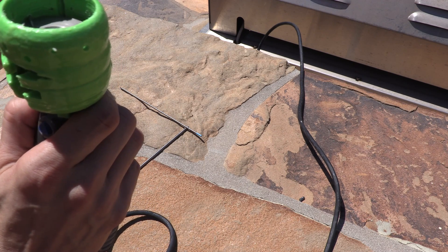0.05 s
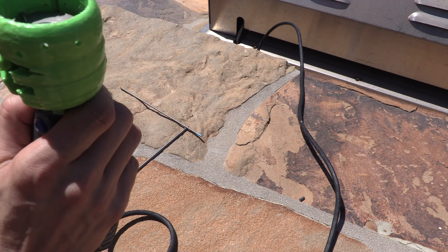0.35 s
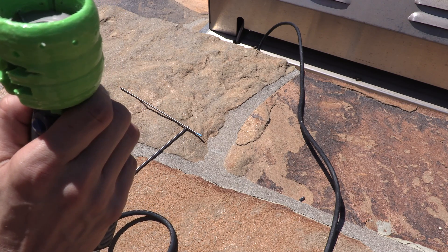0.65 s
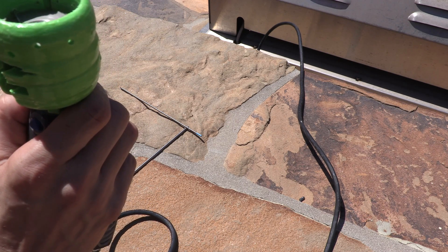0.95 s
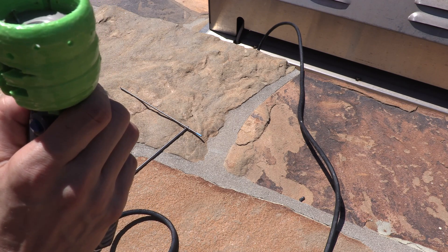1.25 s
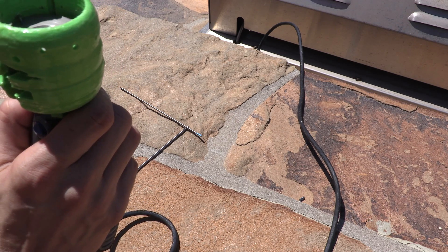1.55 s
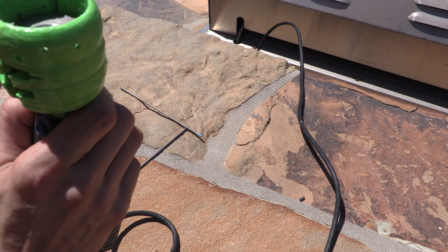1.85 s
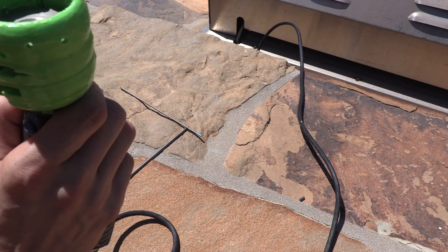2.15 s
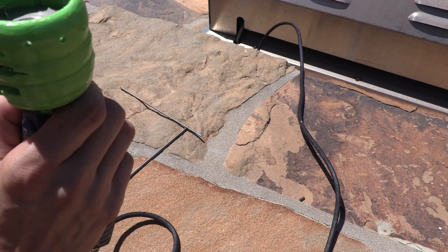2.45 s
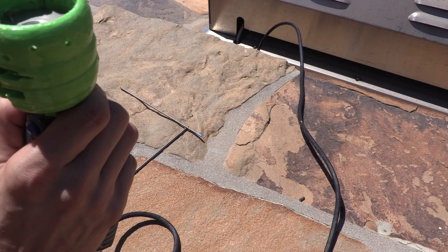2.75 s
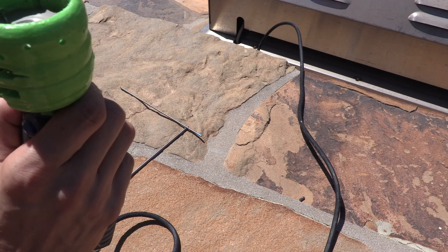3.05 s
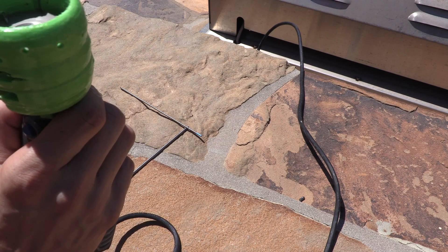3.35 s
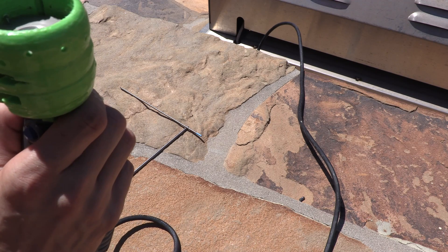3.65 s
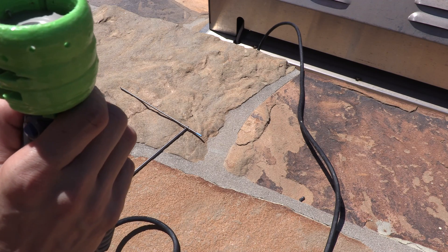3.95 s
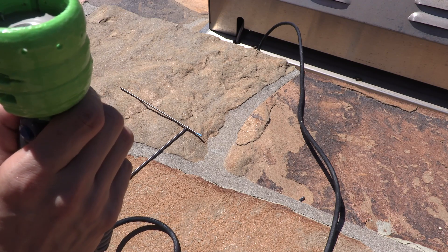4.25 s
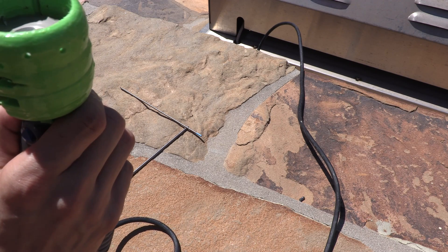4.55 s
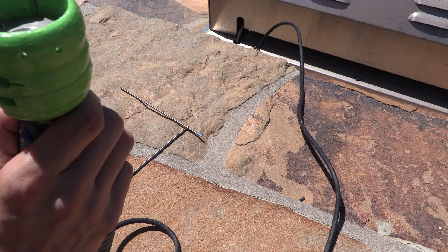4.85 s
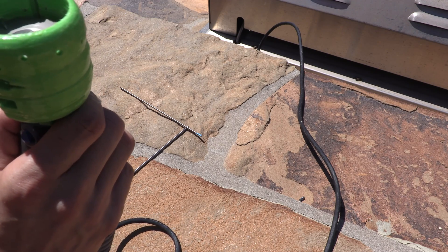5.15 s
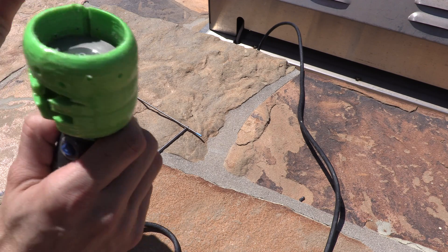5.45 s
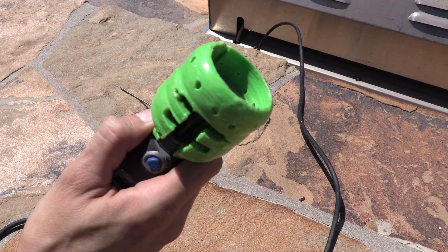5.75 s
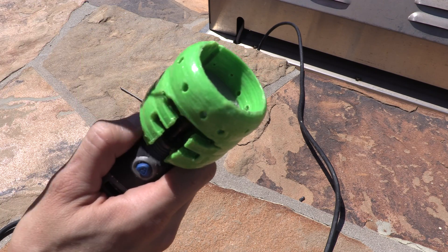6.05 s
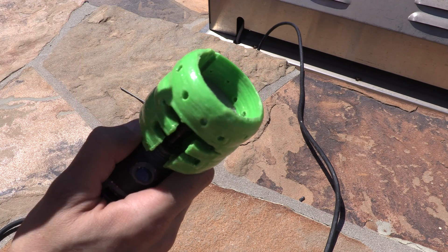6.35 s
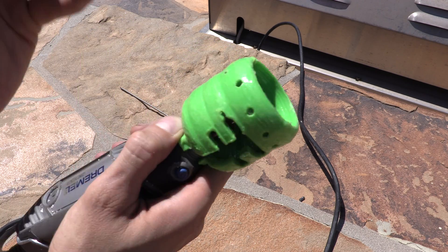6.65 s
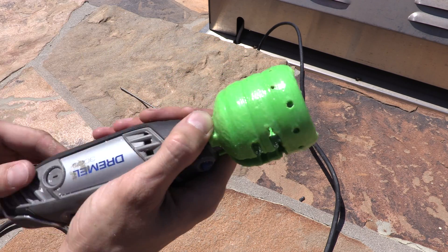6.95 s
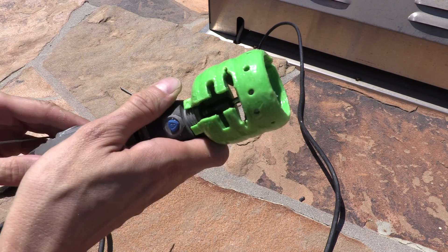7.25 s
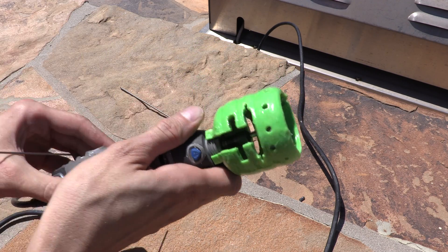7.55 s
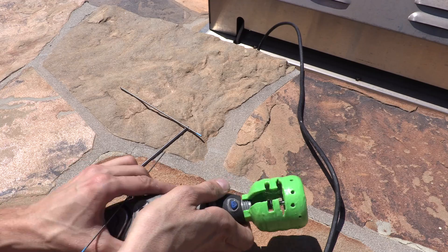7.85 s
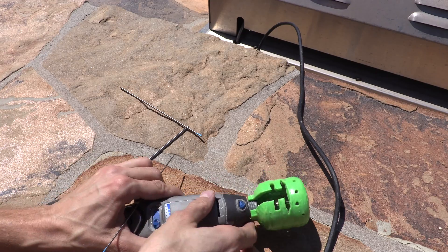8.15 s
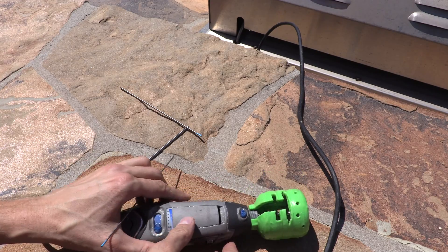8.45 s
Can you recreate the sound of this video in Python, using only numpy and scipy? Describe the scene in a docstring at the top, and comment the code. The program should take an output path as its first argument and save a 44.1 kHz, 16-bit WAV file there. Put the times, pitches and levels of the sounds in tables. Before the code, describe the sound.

Close up, over a faint outdoor wash, a thin metal rod is sharpened on a small rotary tool. After a brief scrape come three gritty, shrill passes of about a second each, the motor sagging under each one and climbing back. The motor then buzzes steadily with a rush of air for a couple of seconds, is switched off and falls in pitch, still coasting when it is laid on stone with a dull bump.

```python
"""Outdoors in a yard, one microphone close to a small mains rotary tool, a steady wash behind it.
A thin metal rod is pressed on the wheel, briefly at the start and then in three passes: the same grit
comes round each turn and rings the rod, while the load drags the humming, whining motor down.
The tool is turned in the hand, vents to the microphone, switched off and laid on stone as it coasts.
Gain control holds the loud passes down."""
import sys
import numpy as np
from scipy import signal
from scipy.fft import rfft, irfft, next_fast_len
from scipy.io import wavfile
from scipy.ndimage import uniform_filter1d

SR = 44100
rng = np.random.default_rng(int(sys.argv[2]) if len(sys.argv) > 2 else 0)


def int16_out(signal):
    """Quantize to a 16-bit WAV file."""
    q = np.round(np.clip(np.atleast_2d(signal).T, -1, 1) * 32767)
    wavfile.write(sys.argv[1], SR, q.astype(np.int16))


N = 374409
T = np.arange(N) / SR
HZ = np.fft.rfftfreq(next_fast_len(N), 1 / SR)
MAINS_HZ, FULL_SPEED_HZ, OFF_S = 60, 284, 7.403  # shaft speeds are in turns a second

# rod on the wheel: touch_s, home_s, easing_s, lift_s, drag_hz, knock_db, ring_db for each mode group
PASSES = [ (-0.1, 0.002, 0.115, 0.135, 15.4, -41.5, -38.5, -31, -30, -33.5),
          (0.388, 0.632, 1.167, 1.352, 67.3, -33.5, -25.5, -27.5, -23.5, -24),
          (2.33, 2.817, 3.001, 3.352, 102.4, -30.5, -26, -28.5, -20.5, -23.5),
          (4.314, 4.614, 4.79, 5.18, 103, -31, -27.5, -33, -24, -27.5), ]
# the rod's modes in four groups, low to high: pitch_hz, width_hz, level_db
ROD_MODES = [
    [(3950, 450, -11), (4560, 290, 0), (5260, 300, -14)],
    [(5900, 350, -6), (6300, 430, 0)],
    [(8170, 520, 0), (9430, 900, -12)],
    [(11000, 500, -9), (11780, 650, 0), (12950, 600, -7), (14150, 700, 1)],
]
# how each mode group grows with pressure as the rod beds in: exponent
BEDDING_POWERS = [0.6, 0.32, 0.75, 0.65]
# the rod skips on the wheel: start_s, end_s, gain_db
SKIPS = [(1.255, 1.276, -5.5), (3.266, 3.282, -2.5), (4.976, 5.054, 0.5)]
# hollow of the guard: pitch_hz, width_hz, level_db
GUARD_MODES = [(438, 37, -16), (832, 108, 0.5), (1010, 590, -24.5)]
# rod and guard catch on the wheel: start_s, end_s, pitch_hz, width_hz, level_db
CATCHES = [(0.979, 1.255, 6200, 200, -26.5), (1.284, 1.305, 4600, 200, -28), (1.327, 1.358, 4640, 200, -27),
           (2.243, 2.348, 3900, 2408, -32.5), (2.38, 2.44, 4650, 200, -32), (2.554, 2.66, 4550, 600, -26),
           (2.787, 2.88, 4340, 400, -23), (3.056, 3.24, 8170, 350, -20.5), (3.188, 3.25, 4560, 202, -29),
           (3.3, 3.366, 4560, 200, -39), (4.254, 4.376, 4090, 2000, -31), (4.391, 4.478, 2370, 480, -29.5),
           (4.414, 4.478, 4430, 900, -26), (4.504, 4.628, 2450, 808, -39.5),
           (4.663, 4.775, 8200, 349.3, -29), (5.101, 5.16, 4670, 197, -23.5), (7.05, 7.14, 2420, 250, -30)]
# speed that the motor seeks with no load: time_s, speed_hz
IDLE_SPEED = [(1.5, 284), (2.3, 281), (2.7, 284), (6.3, 283.3), (6.52, 286.5), (6.9, 284.6), (7.08, 288.8),
              (7.24, 284)]
# the tool's aim, 0 with the microphone behind the guard, 1 with the vents toward it: time_s, facing
FACING = [(5.3, 0.25), (5.8, 0.72), (6.6, 0.97), (7.4, 0.78), (8.49, 0)]
# motor parts at full speed, and their fall as it slows: behind_db, facing_db, fall_db_per_decade
UNBALANCE_LAW = (-39.5, -30, 66)
BUZZ_LAW = (-46, -35.5, 22)
AIR_LAW = (-30.5, -28.5, 63)
BLADE_LAW = (-49.5, -41.5, 25)
BRUSH_LAW = (-43.5, -51, 4.5)
# overtones of the shaft: order, behind_db, facing_db, fall_db_per_decade
SHAFT_ORDERS = [(2, -42.5, -54, 190), (3, -42.5, -48, 170), (4, -48, -59, 230), (5, -56, -57, 90),
                (6, -59, -59, 88), (7, -56, -51, 76), (12, -55, -53, 60), (16, -54, -51, 15),
                (24, -53, -46.5, 40)]
# rush of air from behind the guard, then from in front of the vents: frequency_hz, level_db
AIR_BEHIND = [(30, -40), (70, -18), (150, -17.5), (400, -7), (800, -2), (1350, -9.5), (2100, 1.5),
              (2900, -1), (4100, 8), (5300, 2), (8200, 6), (9800, -4), (11500, -1.5), (14300, -11.5)]
AIR_FACING = [(30, -63), (100, -13), (200, -18), (400, -7), (1300, -8.5), (1900, 4), (2700, 0), (3500, 2.5),
              (5000, 2.5), (5700, 3), (7000, 3), (8700, -2.5), (11000, -2), (14300, -13)]
# resonances at which the blade whine flares: pitch_hz, width_hz, level_db
BLADE_FLARES = [(3770, 880, 2), (4660, 400, 4.5)]
# what the brushes ring: pitch_hz, width_hz, level_db
BRUSH_MODES = [(1870, 1500, -3), (2650, 190, 7.5), (3400, 210, 7), (5080, 1100, 5.5), (5860, 540, 7),
               (6930, 650, 0.5), (8070, 700, 6.5), (9240, 450, 0.5), (11800, 3600, -8)]
# rise and fall of the brush ticking as the tool coasts: time_s, gain_db
COASTING_TICKS = [(7.4, 2), (7.55, -1), (7.85, -3), (8.05, 1.5), (8.2, -1.5), (8.27, 4), (8.36, 1),
                  (8.49, -3.5)]
# the hand shifts its grip: start_s, end_s, level_db
GRIP_SHIFTS = [(4.4, 4.646, -53), (5.678, 5.754, -57), (7.68, 7.853, -63), (8.094, 8.43, -59.5)]
# the tool meets the stone: start_s, level_db
BUMPS = [(8.342, -34), (8.367, -55)]
# plastic housing: pitch_hz, width_hz, level_db
HOUSING_MODES = [(122.6, 110, 12), (705, 360, 3), (1500, 500, -18), (2400, 700, 0)]
# outdoor wash: frequency_hz, level_db
YARD_SPECTRUM = [(25, -29), (60, -9), (130, -6.5), (260, -8), (500, -3), (1100, -0.5), (1600, -8),
                 (2500, -30), (6000, -11), (14000, -23.5)]


def grinding(speed, turns, runout=0.15, fresh_db=-23, bite_db=2.46, stutter_db=2, knock_rise_s=0.14):
    """Grit scrapes the rod, hardest at the wheel's high spot, and rings it; a light touch stutters."""
    skitter = 0.0021 * wander(340)  # the rod slides about, smearing the top overtones into a rasp
    grit = rough_track(turns + skitter, memory_turns=41.6) + amp(fresh_db) * rng.standard_normal(N)
    grit *= 1 + runout * np.cos(2 * np.pi * turns)
    rings = [amp(bite_db * wander(12)) * steady(colour(grit, resonances(modes))) for modes in ROD_MODES]
    bump, stutter, out = knock(speed, turns), wander(19), np.zeros(N)
    for touch, home, easing, lift, _, knock_db, *ring_db in PASSES:
        press, ease = pressure(touch, home, easing, lift)
        contact = press * ease ** 0.35
        scrape = sum(amp(db) * contact ** power * ring
                     for db, power, ring in zip(ring_db, BEDDING_POWERS, rings))
        scrape *= amp(stutter_db * (1 - press * ease) * stutter)
        knocking = np.clip((T - touch) / knock_rise_s, 0, 1) * ease ** 0.42
        out += scrape + amp(knock_db) * knocking * bump
    return out * amp(sum(db * window(start, end, fade_s=0.015) for start, end, db in SKIPS))


def knock(speed, turns):
    """The wheel's high spot bumps the rod once a turn; overtones boom as they cross the guard's modes."""
    return np.sqrt(2) * sum(amp(db) * peak(k * speed, hz, width) * np.cos(2 * np.pi * k * turns + k ** 2)
                            for k in range(2, 8) for hz, width, db in GUARD_MODES)


def chatter(turns, fade_s=0.019, sharpness=0.77):
    """Rod and guard rattle once a turn where they catch."""
    taps = rough_track(turns, memory_turns=16) * np.exp(sharpness * np.cos(2 * np.pi * turns))
    return sum(amp(db) * window(start, end, fade_s) * steady(colour(taps, peak(HZ, hz, width)))
               for start, end, hz, width, db in CATCHES)


def shaft_speed(start_sag_hz=30, inertia_s=0.182, friction_hz_per_s=178, air_drag_s=6):
    """The rod drags the speed down, smoothed by inertia; switched off, friction and air drag brake it."""
    drag = sum(np.minimum(*pressure(*row[:4])) * row[4] for row in PASSES)
    keep = np.exp(-1 / (inertia_s * SR))
    sag = signal.lfilter([1 - keep], [1, -keep], drag) + start_sag_hz * np.exp(-T / inertia_s)
    slowing = np.exp(-np.maximum(T - OFF_S, 0) / air_drag_s)
    return (curve(IDLE_SPEED) - sag) * slowing - friction_hz_per_s * air_drag_s * (1 - slowing)


def shaft(speed, turns, mains_phase, facing, body_hz=248, ripple_db=-14, sway_db=1.8):
    """Unbalance shakes the body near its resonance; overtones waver, torque ripple adds a higher line."""
    angle = 2 * np.pi * turns
    lowering = np.clip((7.8 - T) / 0.33, 0, 1)  # the hum dies as the tool is lowered
    hum = level(UNBALANCE_LAW, speed, facing) * peak(speed, body_hz, width_hz=80)
    hum *= amp(sway_db * wander(8.6)) * lowering
    ripple = amp(ripple_db) * facing * window(0, OFF_S) * np.cos(angle + mains_phase)
    out = hum * (np.cos(angle) + ripple)
    for order, *law in SHAFT_ORDERS:
        phase = order * angle + order ** 2 + 0.28 * wander(17)
        waver_db = 1.61 * np.sqrt(order) * wander(5.2)
        out += level(law, speed, facing) * amp(waver_db) * np.cos(phase)
    return np.sqrt(2) * out


def armature(speed, turns, mains_phase, facing, slots=8, throb=1.3, rough_db=1, fade_db_per_s=14):
    """The slots pull on the housing in a rough burst each mains half wave; the buzz fades once off."""
    pull = np.sqrt(2) * np.cos(2 * np.pi * slots * turns + 0.07 * wander(11))
    housing = peak(HZ, centre_hz=2220, width_hz=830)
    rattle = colour(rough_track(turns, memory_turns=9.3), housing)
    bursts = np.exp(throb * np.cos(mains_phase) * window(0, OFF_S))
    buzz = steady(colour((pull + amp(rough_db) * rattle) * bursts, housing))
    return level(BUZZ_LAW, speed, facing) * amp(-fade_db_per_s * np.maximum(T - OFF_S, 0)) * buzz


def fan(speed, turns, facing, blades=18, swirl_db=0.66, waver_db=2):
    """Air rushes through the vents; the blades add a whine that flares as it crosses a resonance."""
    rush = np.sqrt(1 - facing) * noise(spectrum(AIR_BEHIND))
    rush += np.sqrt(facing) * noise(spectrum(AIR_FACING))
    whine = np.sqrt(2) * np.cos(2 * np.pi * blades * turns + 0.5 * wander(38))
    whine *= amp(waver_db * wander(21))
    rush *= amp(swirl_db * wander(40))
    flare = 1 + sum(amp(db) * peak(blades * speed, hz, width) for hz, width, db in BLADE_FLARES)
    return level(AIR_LAW, speed, facing) * rush + level(BLADE_LAW, speed, facing) * flare * whine


def brushes(speed, turns, facing, bars=8, uneven_db=-9, flutter_db=3.5):
    """Commutator bars tick under the brushes, clearest when coasting; overtones flare at each mode."""
    angle = 2 * np.pi * bars * turns + 0.25 * wander(27)
    ticks = sum(np.cos(k * (angle + rng.uniform(0, 2 * np.pi))) * (k * bars * speed < SR / 2)
                for k in range(1, 18))
    ticks = steady(ticks) + amp(uneven_db) * rough_track(turns, memory_turns=100)
    ring = colour(ticks, resonances(BRUSH_MODES))
    ring = np.where(T < OFF_S, ring, steady(ring))  # coasting, the flares run together
    return level(BRUSH_LAW, speed, facing) * amp(curve(COASTING_TICKS) + flutter_db * wander(19)) * ring


def handling(t60_s=0.038, holding_db=-75):
    """Low rubbing of the hand, and dull bumps of the housing on stone."""
    rub = amp(holding_db) + sum(amp(db) * window(start, end, fade_s=0.071)
                                for start, end, db in GRIP_SHIFTS)
    rumble = noise(resonances([(80, 73, -0.16), (124, 42, -1.8)]))
    blows = sum(amp(db - 60 * np.maximum(T - start, 0) / t60_s) * (T >= start) for start, db in BUMPS)
    return rub * rumble + blows * noise(resonances(HOUSING_MODES))


def yard(wash_db=-54, drone_db=-62, drone_hz=175):
    """Steady outdoor wash behind the tool; a faint low drone comes in as the motor dies away."""
    drone = np.clip((T - OFF_S) / 0.3, 0, 1) * noise(peak(HZ, drone_hz, width_hz=14))
    return amp(wash_db) * noise(spectrum(YARD_SPECTRUM)) + amp(drone_db) * drone


def pressure(touch, home, easing, lift):
    """The two ramps of a pass, 0 to 1: pressing in and easing off."""
    return np.clip((T - touch) / (home - touch), 0, 1), np.clip((lift - T) / (lift - easing), 0, 1)


def level(law, speed, facing):
    """Gain of a motor part at the microphone: it sinks with the speed and changes as the vents turn."""
    behind_db, facing_db, fall_db = law
    return amp(behind_db + (facing_db - behind_db) * facing + fall_db * np.log10(speed / FULL_SPEED_HZ))


def rough_track(turns, memory_turns, points=160, upsample=4):
    """A rough circular track read once a turn; its bumps slowly wear into new ones."""
    keep = np.exp(-1 / memory_turns)
    bumps = rng.standard_normal((N // 16, points))[:int(turns[-1]) + 2]
    bumps[1:] *= np.sqrt(1 - keep ** 2)
    worn = signal.lfilter([1], [1, -keep], bumps, axis=0)
    track = signal.resample_poly(worn.ravel(), upsample, 1)
    return unit(np.interp(turns * points * upsample, np.arange(len(track)), track))


def amp(db):
    """Decibels to gain."""
    return 10 ** (np.asarray(db) / 20)


def unit(x):
    """Scales to rms 1."""
    return x / np.sqrt(np.mean(x ** 2) + 1e-20)


def steady(x, size=1500):
    """Holds the short-time rms at 1."""
    return x / np.sqrt(abs(uniform_filter1d(uniform_filter1d(x ** 2, size), size)) + 1e-9)


def curve(points):
    """Joins (time_s, value) points by straight lines."""
    return np.interp(T, *np.transpose(points))


def window(start, end, fade_s=0.0043):
    """Opens just before start and closes just before end."""
    return np.clip((T - start) / fade_s + 1, 0, 1) * np.clip((end - T) / fade_s, 0, 1)


def peak(hz, centre_hz, width_hz):
    """Gain of one resonance."""
    return 1 / (1 + (2 * (hz - centre_hz) / width_hz) ** 2)


def resonances(modes):
    """Gain at each frequency from (pitch_hz, width_hz, level_db) modes."""
    return sum(amp(db) * peak(HZ, hz, width) for hz, width, db in modes)


def spectrum(points):
    """Gain at each frequency from (frequency_hz, level_db) points."""
    hz, db = np.transpose(points)
    return amp(np.interp(np.log(HZ + 1), np.log(hz), db))


def colour(x, gain):
    """Filters x; the result has rms 1."""
    size = next_fast_len(N)
    return unit(irfft(rfft(x, size) * gain, size)[:N])


def noise(gain):
    """Coloured noise of rms 1."""
    return colour(rng.standard_normal(N), gain)


def wander(rate_hz):
    """Random drift of rms 1."""
    return noise(np.exp(-(HZ / rate_hz) ** 2))


def scene():
    """At the microphone, in mono: one shaft drives every part of the tool, with the yard behind."""
    speed = shaft_speed()
    turns = np.cumsum(speed * (1 + 0.00087 * wander(16.5))) / SR
    mains_phase = 4 * np.pi * MAINS_HZ * T  # one cycle each half wave
    facing = np.clip(curve(FACING), 0, 1)
    motor = shaft(speed, turns, mains_phase, facing) + armature(speed, turns, mains_phase, facing)
    motor += fan(speed, turns, facing) + brushes(speed, turns, facing)
    return (motor + grinding(speed, turns) + chatter(turns) + handling() + yard())[None]


def record(dry, threshold_db=-31.5, squeeze=0.35, recovery_db_per_s=100, cutoff_hz=14440):
    """Gain control holds the grinding down and leaves a short dip after each pass; then a low-pass."""
    power_db = 10 * np.log10(abs(uniform_filter1d(dry[0] ** 2, size=600)) + 1e-12)
    fall_db = recovery_db_per_s * T
    peak_db = np.maximum.accumulate(power_db + fall_db) - fall_db
    over_db = np.maximum(peak_db - threshold_db, 0)
    held = dry * amp(-squeeze * uniform_filter1d(over_db, size=200))
    low_pass = signal.firwin(701, cutoff_hz, window=("kaiser", 8), fs=SR)
    return signal.oaconvolve(held, low_pass[None], "same")


dry = scene()
out = record(dry)
int16_out(out)
```